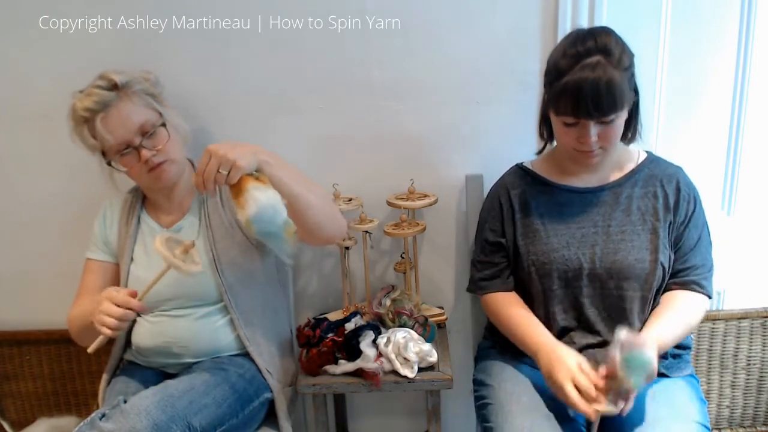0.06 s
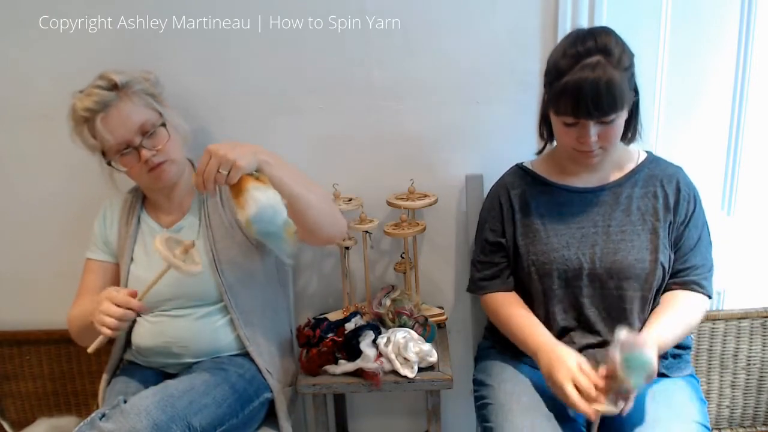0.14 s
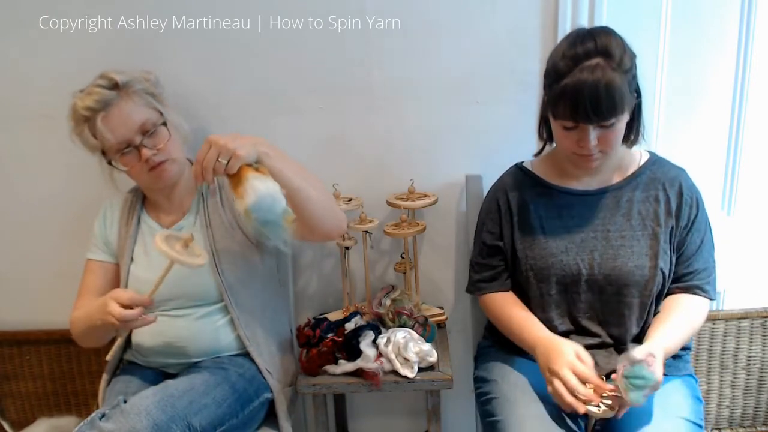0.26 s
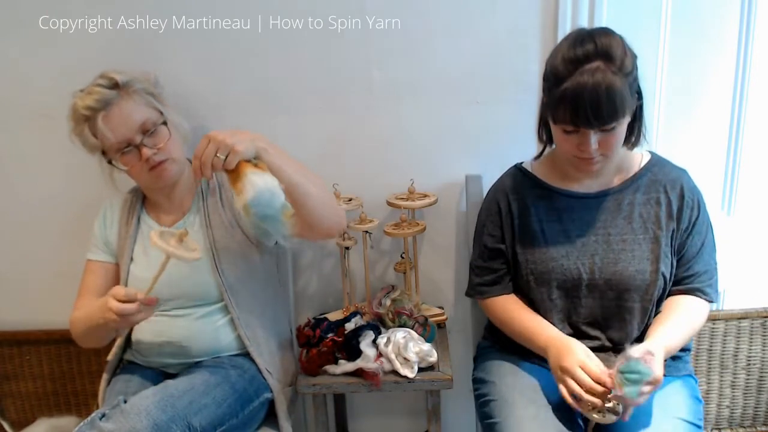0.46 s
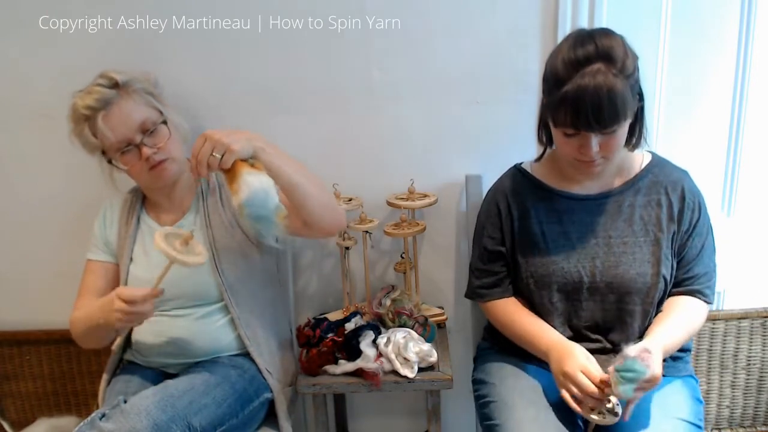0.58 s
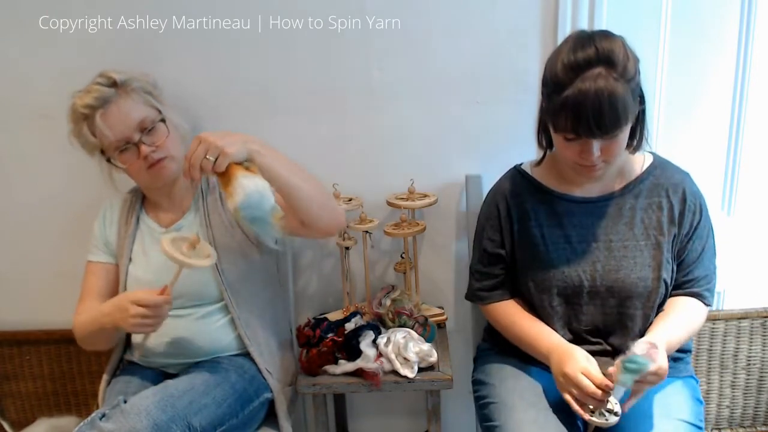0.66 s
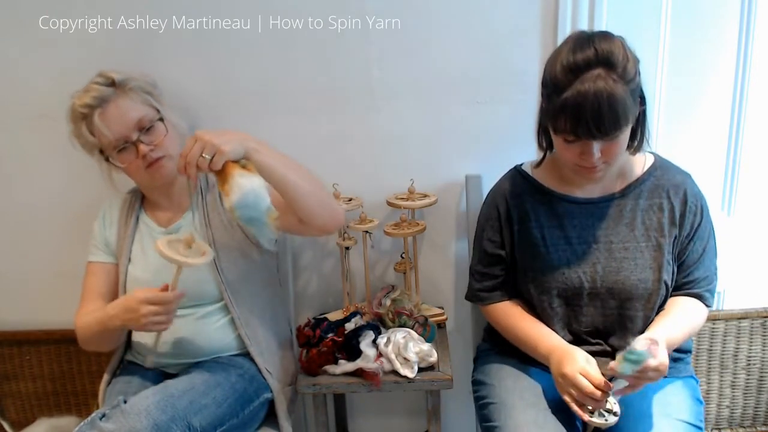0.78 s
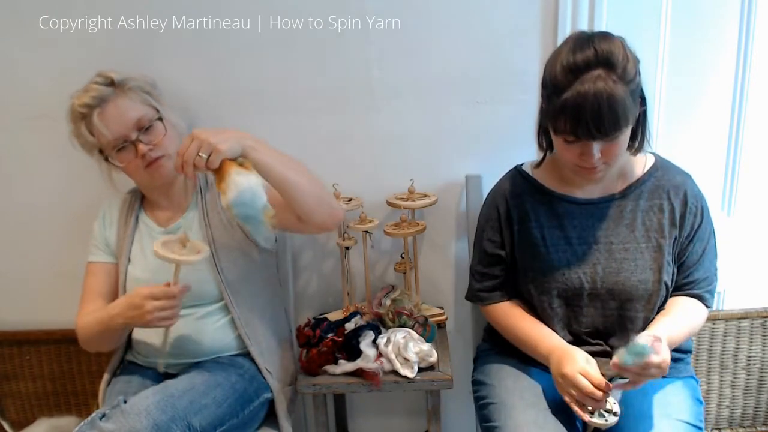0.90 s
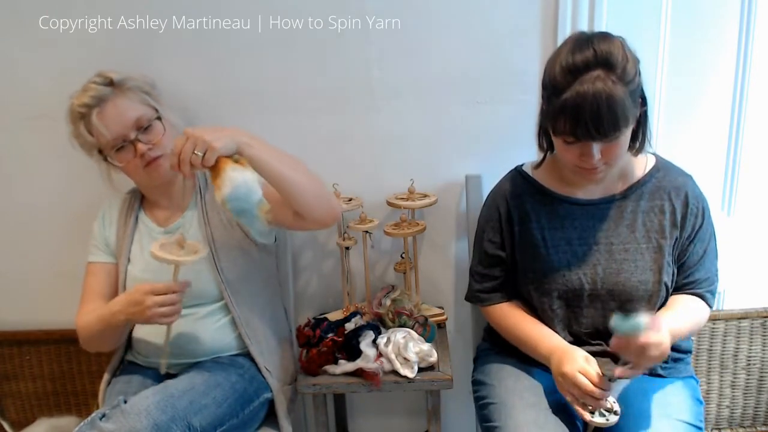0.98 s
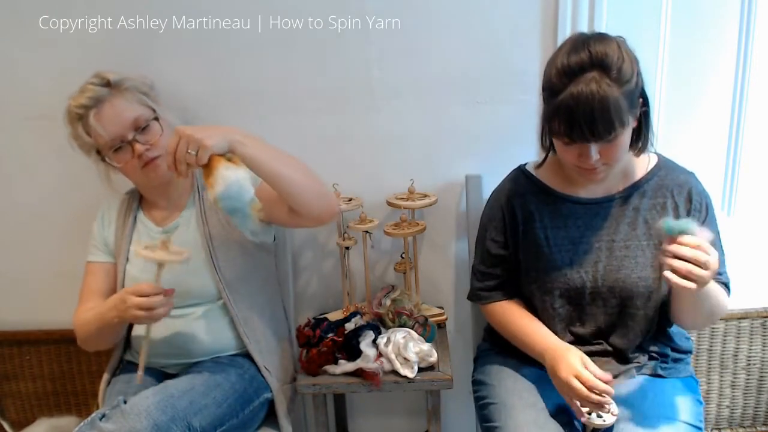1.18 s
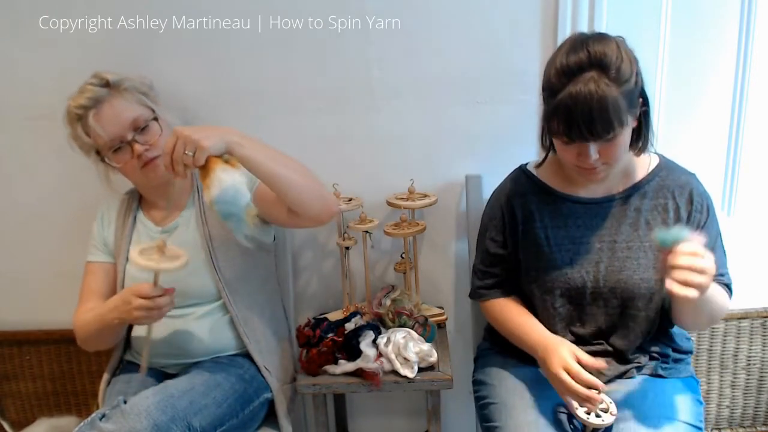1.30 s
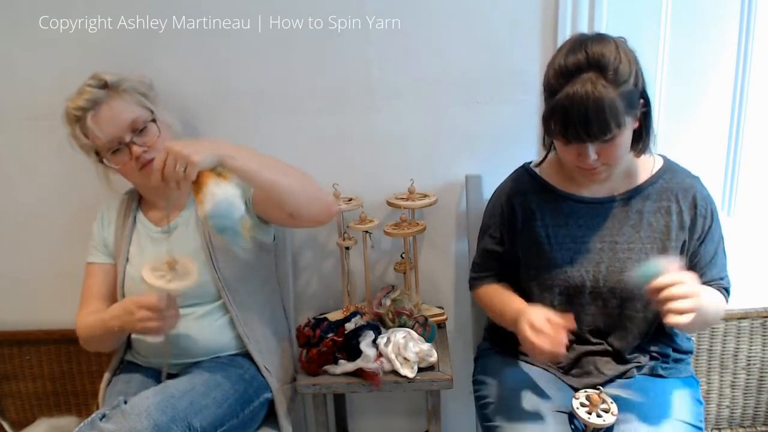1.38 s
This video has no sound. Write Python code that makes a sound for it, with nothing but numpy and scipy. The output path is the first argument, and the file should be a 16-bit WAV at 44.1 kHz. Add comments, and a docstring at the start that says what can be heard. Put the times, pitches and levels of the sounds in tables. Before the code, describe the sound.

One loud hollow wood knock comes early, with a crack and quick bounce. Small handling bumps, shaft taps and a faint wool rustle lead to a softer, duller knock, in a quiet indoor room.

```python
"""A wooden spindle is set down hard on a hollow wooden seat in a quiet room, then once more, softly.
Contacts are short wave packets; the wood rings as decaying modal bands under a broadband crack or rattle.
Before, between and after the blows hands and legs bump dully (low packets); before and between them the
shaft taps (packets, modes) and wool rustles (swelling noise bands); between them skin scuffs wood (resonant
noise). Throughout, a machine hums faintly far off (wavering noise bands) over the noise of the room."""
import sys
import numpy as np
from scipy import signal
from scipy.fft import rfft, irfft
from scipy.io import wavfile
from scipy.ndimage import uniform_filter1d

SR = 44100
rng = np.random.default_rng(int(sys.argv[2]) if len(sys.argv) > 2 else 0)


def wav_out(sig):
    """Save sig, one row per channel (or a flat mono array), as 16-bit PCM at SR to the path in sys.argv[1]."""
    wavfile.write(sys.argv[1], SR, np.round(np.clip(np.atleast_2d(sig).T, -1, 1) * 32767).astype(np.int16))


def convert_level_to_amplitude(level_db):
    """Map a level in decibels to its linear amplitude factor."""
    exponent = np.asarray(level_db, float) / 20
    return 10 ** exponent


N = 63945
T = np.arange(N) / SR  # time, s


def at(points, hz):
    """Spectral interpolation: read an (f/Hz, level/dB) table on a log-frequency axis."""
    p = np.array(points, float)
    return np.interp(np.log(hz), np.log(p[:, 0]), p[:, 1])


def unit(x):
    """Power normalisation: scale to rms 1."""
    return x / np.sqrt(np.mean(x ** 2))


def band(hz, width_hz):
    """Narrow-band noise: a Gaussian spectral weight, two standard deviations wide, at rms 1."""
    f = np.arange(N // 2 + 1) * SR / N
    bell = np.exp(-.5 * ((f - hz) / (width_hz / 2)) ** 2)
    return unit(irfft(rfft(rng.standard_normal(N)) * bell, N))


def walk(rate):
    """Slow random modulation: normal draws held 1 / rate s, then smoothed twice."""
    k = int(SR / rate)
    held = np.repeat(rng.standard_normal(N // k + 1), k)
    smooth = uniform_filter1d(uniform_filter1d(held, k), k)
    return 1.3 * smooth[:N]  # makes up the spread lost in smoothing


def fade(start_s, attack_s, t60_s):
    """Reverberant decay law: linear attack, then exponential release."""
    t = T - start_s
    return np.clip(t / attack_s, 0, 1) * convert_level_to_amplitude(-60 * np.maximum(t - attack_s, 0) / t60_s)


def gated(t, t60_s):
    """Gated decay: the level falls ever faster, as under a noise suppressor."""
    gate_db_per_s2 = 1699.5
    return convert_level_to_amplitude(-60 * t / t60_s - gate_db_per_s2 * t ** 2)


def ring(modes, hits):
    """Modal superposition: each mode is a narrow wavering band blurred by the room; soft hits miss high modes."""
    swell_s, blur_hz, reach_db = 0.024, 50, 6  # reach_db: loss at the highest mode reached
    out = 0
    for hz, db, t60_s in modes:
        env = 0
        for start_s, hit_db, top_hz in hits:
            t = np.maximum(T - start_s, 0)
            strength = convert_level_to_amplitude(hit_db - reach_db * (hz / top_hz) ** 4)
            env = env + strength * np.clip(t / swell_s, 0, 1) ** 2 * gated(t, t60_s)
        out = out + convert_level_to_amplitude(db) * env * band(hz, blur_hz)
    return out


def coloured(points, lo, shape):
    """Filter-bank synthesis: sixth-octave noise bands from lo Hz up, each with its own envelope."""
    hzs = lo * 2 ** np.arange(0, np.log2(points[-1][0] / lo), 1 / 6)
    gains = convert_level_to_amplitude(at(points, hzs)) * np.sqrt(hzs)  # level per Hz to level per band
    gains = gains / np.sqrt(np.sum(gains ** 2))
    return sum(g * shape(hz) * band(hz, hz / 9.2) for g, hz in zip(gains, hzs))


def grains(table):
    """Pulses as wave packets: each row is a few cycles of a cosine under a Gaussian bell."""
    out = 0
    for centre_s, db, hz, cycles in table:
        t = T - centre_s
        bell = np.exp(-.5 * (t * hz / cycles * 3.44) ** 2)
        out = out + convert_level_to_amplitude(db) * bell * np.cos(2 * np.pi * hz * t)
    return out


def puffs(table):
    """Amplitude-modulated noise: each row is a band that swells and fades."""
    return sum(convert_level_to_amplitude(db) * fade(start_s, attack_s, t60_s) * band(hz, width_hz)
               for start_s, db, attack_s, t60_s, hz, width_hz in table)


def room():
    """Stationary background: rumble and air flicker band by band, the treble less, and a faint machine hum."""
    # relative spectrum of rumble and air: f/Hz, level/dB per Hz
    room_spectrum = [(30, -38.5), (70, -19.5), (110, -6.5), (160, -2.5), (280, -13), (455, -20), (718, -24),
                     (1420, -26), (3000, -35), (5000, -38), (7500, -44.5)]
    # the background swells and settles: t/s, level/dB
    room_levels = [(0, -69.5), (.2, -66), (.9, -67.5), (1.25, -70.5), (1.45, -71)]
    # wavering machine tones: f/Hz, width/Hz, mean level/dB
    hum_tones = [(852.4, 41, -80.5), (1760, 89, -92.5)]
    flicker_db, hum_waver_db = 3.5, 1.9

    def flicker(hz):
        return convert_level_to_amplitude(flicker_db * min(1, (400 / hz) ** .4) * walk(16))

    air = coloured(room_spectrum, 35, flicker)
    hum = sum(convert_level_to_amplitude(db + hum_waver_db * walk(6.7)) * band(hz, w) for hz, w, db in hum_tones)
    return convert_level_to_amplitude(np.interp(T, *np.array(room_levels).T)) * air + hum


def brushes():
    """Fibre friction: wool makes airy noise bands that swell and fade."""
    # brushes of wool: start t/s, level/dB, attack/s, t60/s, f/Hz, width/Hz
    wool_brushes = [(.008, -82, .012, .35, 5500, 450), (.11, -80, .05, .3, 4200, 3000),
                    (.88, -77, .175, .1, 4500, 3200)]
    return puffs(wool_brushes)


def bumps():
    """Soft impact: hands and legs give dull, mostly low wave packets."""
    # bumps of hands and legs: centre t/s, peak level/dB, f/Hz, cycles
    body_bumps = [(.04, -52, 120.4, 2.1), (0.059, -45, 263, 3.2), (0.073, -43.5, 198, 1.87),
                  (.075, -48, 73, 1.6), (0.089, -49, 148, 3.6), (0.115, -24.5, 112, 1.85),
                  (0.131, -36, 246, 3.13), (.14, -40.5, 333, 3.8), (.148, -49.5, 505, 4.7),
                  (0.16, -31, 105.1, 3), (.165, -38.5, 330, 2.4), (.188, -41.5, 170, 8.8),
                  (.21, -41, 69.67, 1.5), (0.301, -51.5, 85.56, 6.0), (0.398, -63, 97.9, 3.4),
                  (.478, -34.5, 92.6, 1.67), (.49, -60, 210, 6.1), (.485, -67, 575, 11.4),
                  (.525, -50.5, 136.7, 14.2), (0.549, -53, 73.4, 2.2), (0.58, -38.5, 157.4, 0.96),
                  (.592, -37, 182.4, 1.43), (0.634, -61.5, 135.3, 4.6), (.674, -50, 146, 0.86),
                  (.735, -56.5, 233, 8.1), (0.743, -52.5, 139.1, 7), (0.82, -40, 108, 3.04),
                  (.77, -61, 81, 5.5), (0.85, -53.5, 184, 3.8), (.95, -65.5, 156.9, 9.0),
                  (1.135, -63, 80.5, 3.0), (1.341, -63.5, 110.5, 5.3), (1.436, -52.5, 180.5, 3.7)]
    return grains(body_bumps)


def taps():
    """Impulse excitation of a bar: direct packets from the tapped shaft, and its ringing modes."""
    # direct sound of the taps: centre t/s, peak level/dB, f/Hz, cycles
    tap_blows = [(.143, -53.5, 620, 5.7), (.624, -59.5, 726, 9.6), (.7225, -51, 684, 6.3),
                 (.7325, -44, 708, 4.7)]
    # the shaft set ringing: start t/s, level/dB, highest mode reached f/Hz
    shaft_hits = [(.617, -62.5, 910), (0.718, -54.5, 2000), (0.729, -56.5, 895)]
    # modes of the shaft: f/Hz, relative level/dB, t60/s before the gating
    shaft_modes = [(590, 1.5, 0.094), (702, -4.5, 0.27), (810, -1, 0.14), (430, -7.5, 0.18),
                   (1637, -7, 0.15)]
    return grains(tap_blows) + ring(shaft_modes, shaft_hits)


def crack():
    """Broadband noise: a faint hiss just ahead of the hard blow, then the hard contact's snap and a room tail
    that loses treble first."""
    # first row: a faint noise just ahead of the hard blow; second row: its crack: start t/s, level/dB
    noise_bursts = [(.194, -52.5), (0.2057, -31)]
    # relative spectrum of both: f/Hz, level/dB per Hz
    crack_spectrum = [(900, -2), (1170, 2), (1460, -10.5), (1640, -5), (2150, -8.5), (2700, -9.5),
                      (3500, -15.5), (5600, -21.5), (7050, -36.5)]
    snap_db, snap_t60_s = 5, 0.021
    t60_low_s, t60_high_s, gate_db_per_s2 = 0.51, .16, 2501  # t60 at 1 and 7 kHz before the gating

    def tail(hz):
        t60_s = np.interp(np.log(hz), np.log([1000, 7000]), [t60_low_s, t60_high_s])
        out = 0
        for start_s, db in noise_bursts:
            snap = convert_level_to_amplitude(snap_db) * fade(start_s, .001, snap_t60_s)
            decay = fade(start_s, 0.0048, t60_s) * convert_level_to_amplitude(-gate_db_per_s2 * (T - start_s) ** 2)
            out = out + convert_level_to_amplitude(db) * (snap + decay)
        return out

    return coloured(crack_spectrum, 900, tail)


def blows():
    """Impact on a hollow body: direct packets, ringing modes, the crack, and the soft blow's bright rattle."""
    # first row: a faint packet just ahead of the hard blow; the rest: contacts of the falling and
    # bouncing spindle: centre t/s, peak level/dB, f/Hz, cycles
    blow_packets = [(.199, -32.5, 600, 2.3), (.2073, -6.5, 703.6, 2.4), (.2085, -15.5, 331.3, 1.945),
                    (.2157, -3.5, 260, 2.8), (.2157, -14.5, 600, 1.5), (.2197, -10, 572, 2.3),
                    (.2315, -18.5, 504, 10), (.2388, -10, 579, 2.03), (1.0545, -22.5, 403, 3.3),
                    (1.0616, -9.5, 295.4, 2.27), (1.076, -19.5, 280, 1.59), (1.0855, -16.5, 351.3, 1.47)]
    # the wood set ringing: start t/s, level/dB, highest mode reached f/Hz
    wood_hits = [(0.208, -16.5, 1509), (1.054, -27, 590)]
    # modes of the struck wood: f/Hz, relative level/dB, t60/s before the gating
    wood_modes = [(153.9, -5, 0.62), (199, -5, 0.84), (244, -0.5, 0.54), (309, 1, 0.37), (366.5, 2, 0.31),
                  (476.5, -2.5, 0.6), (552, 0, 0.26), (621, -2.5, 0.28), (664, -7.5, 0.32), (730, 2.5, .16),
                  (757, -10, 0.5), (858, -10.5, 0.35), (1061, -16.5, .17), (1330, -17, .15)]
    # bright bands rattled by the soft blow: start t/s, level/dB, attack/s, t60/s, f/Hz, width/Hz
    rattle_bands = [(1.05, -68, .012, .22, 2170, 500), (1.05, -76, .01, .15, 1620, 250)]
    return grains(blow_packets) + ring(wood_modes, wood_hits) + crack() + puffs(rattle_bands)


def scuffs():
    """Friction-excited resonance: skin on wood excites a few bright, grainy bands."""
    # scuffs of skin on wood: start t/s, level/dB, attack/s, t60/s
    skin_scuffs = [(0.614, -58, 0.0036, 0.12), (.635, -71.5, 0.0059, .15), (0.661, -81, .008, 0.11),
                   (0.706, -74, .012, 0.171)]
    # resonances: f/Hz, width/Hz, relative level/dB
    scuff_bands = [(2020, 900, -16), (3030, 83, -13.5), (3545, 350, -5.5), (4260, 570, -1),
                   (4820, 670, -13), (5450, 400, -13)]
    flicker_db = 1.5
    env = sum(convert_level_to_amplitude(db) * fade(start_s, attack_s, t60_s) for start_s, db, attack_s, t60_s in skin_scuffs)
    return env * sum(convert_level_to_amplitude(db + flicker_db * walk(60)) * band(hz, w) for hz, w, db in scuff_bands)


def scene():
    """Linear superposition of all sources in one channel."""
    return (room() + brushes() + bumps() + taps() + blows() + scuffs())[None, :]


def band_limit(x):
    """A steep low-pass at the top of the band."""
    return signal.sosfilt(signal.butter(12, 7200, fs=SR, output="sos"), x)


def record(dry):
    """Band limitation: a narrow microphone channel with a steep top, then faint converter hiss."""
    bass_cut_hz, top_hz, hiss_db = 40, 7670, -89.5
    x = signal.sosfilt(signal.butter(2, bass_cut_hz, "high", fs=SR, output="sos"), dry)
    x = signal.sosfilt(signal.cheby1(14, 1, top_hz, fs=SR, output="sos"), x)
    mix = x + convert_level_to_amplitude(hiss_db) * rng.standard_normal(x.shape)
    return band_limit(mix)


dry = scene()
out = record(dry)
wav_out(out)
```